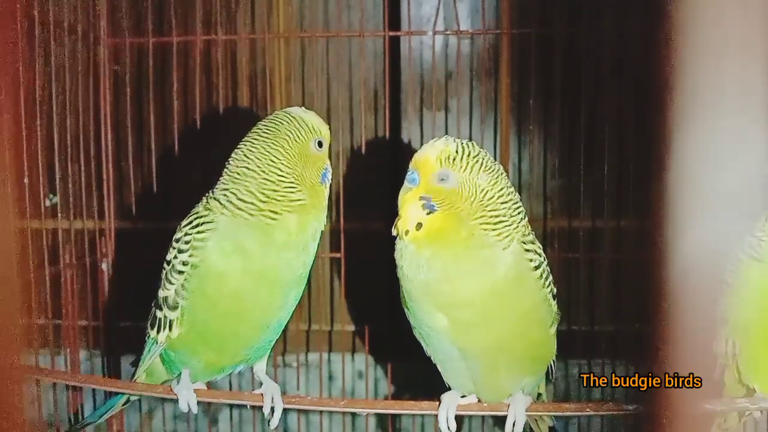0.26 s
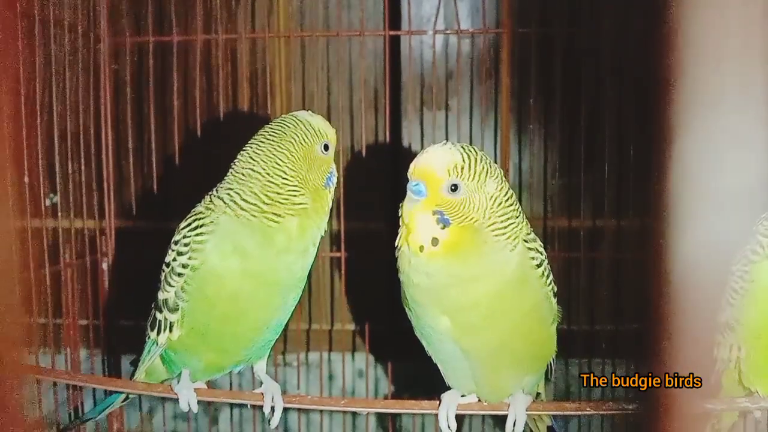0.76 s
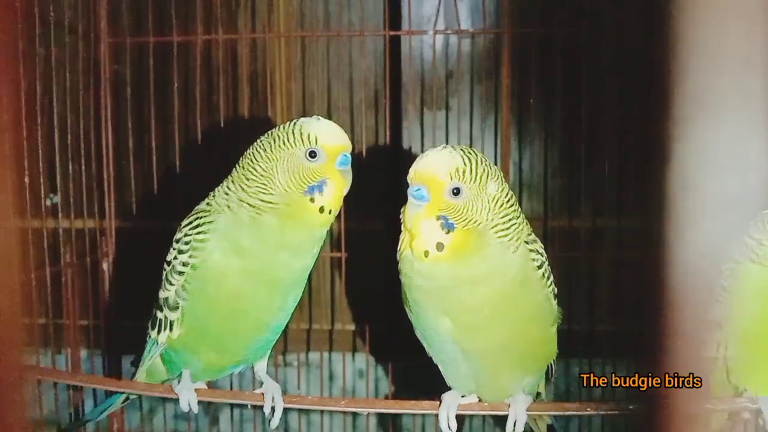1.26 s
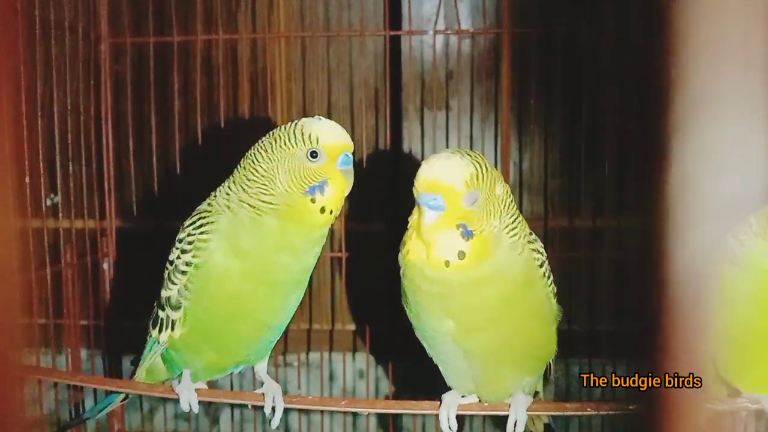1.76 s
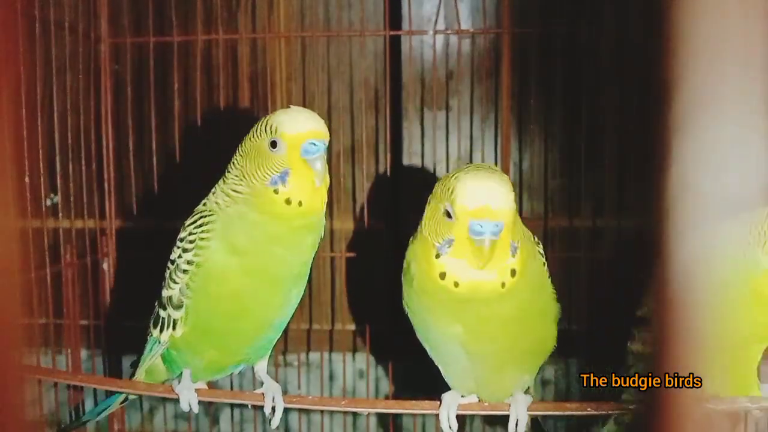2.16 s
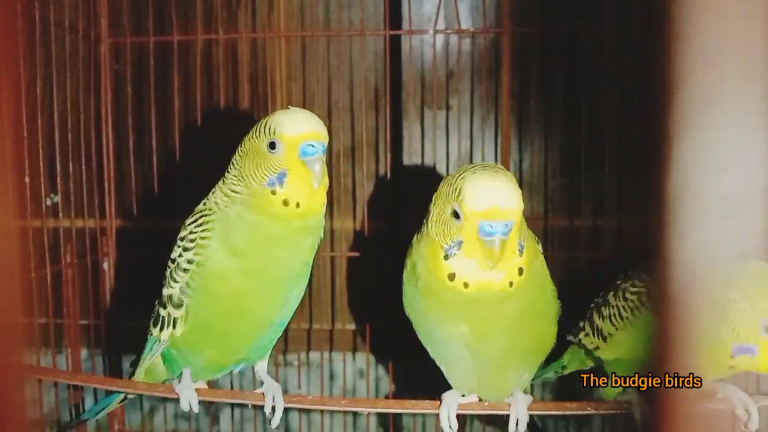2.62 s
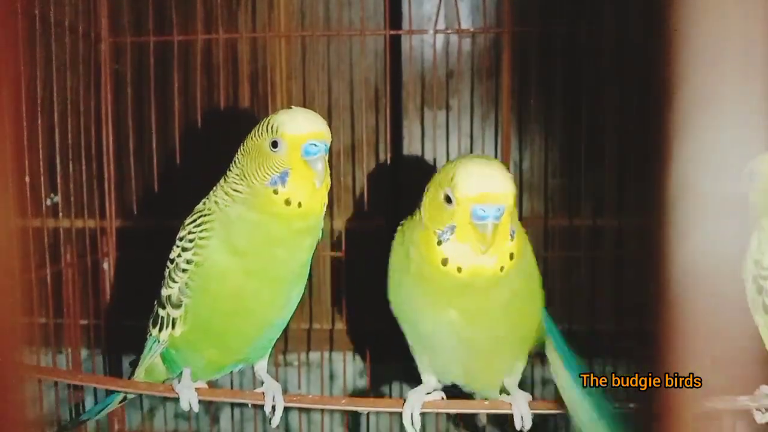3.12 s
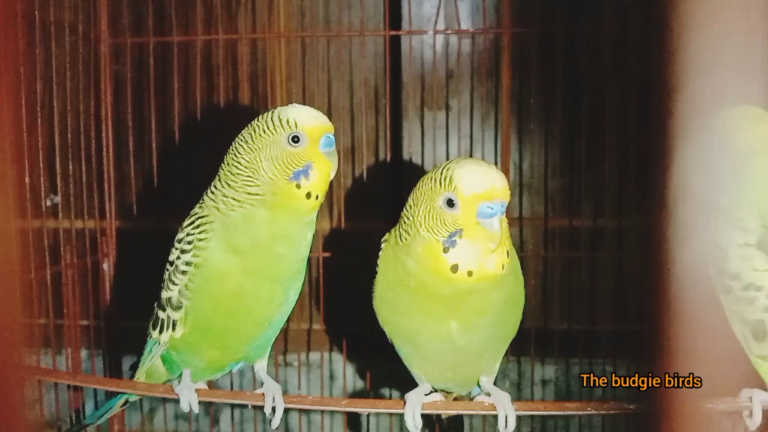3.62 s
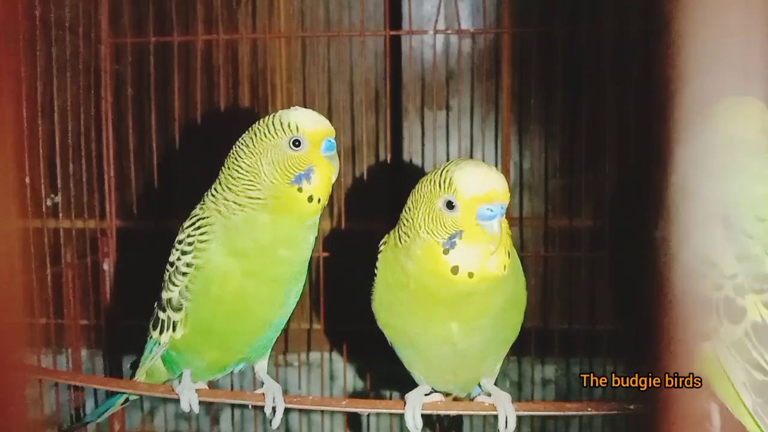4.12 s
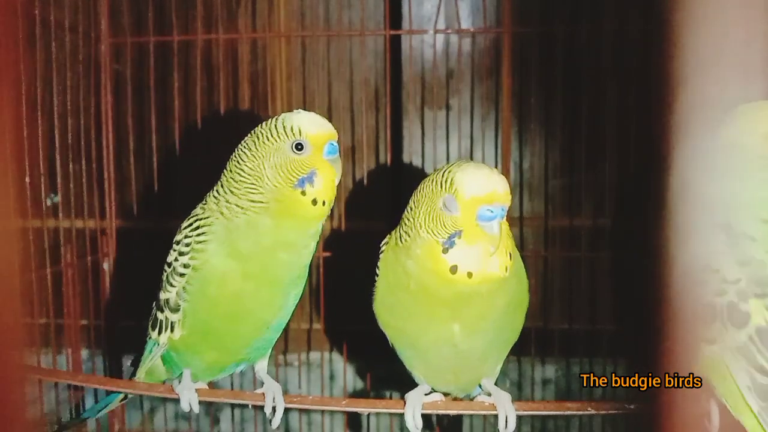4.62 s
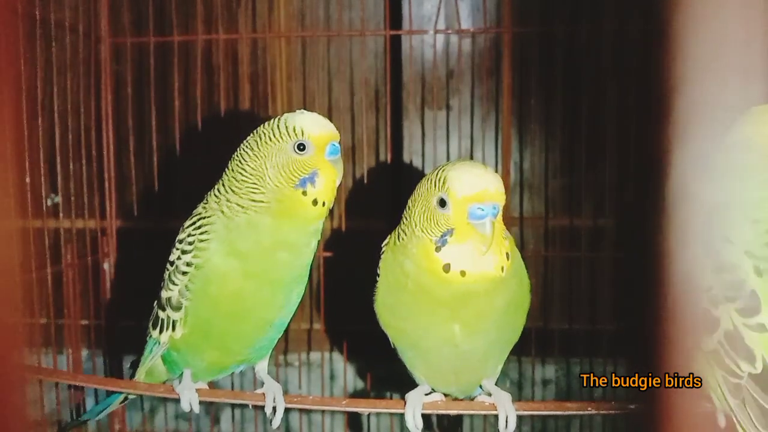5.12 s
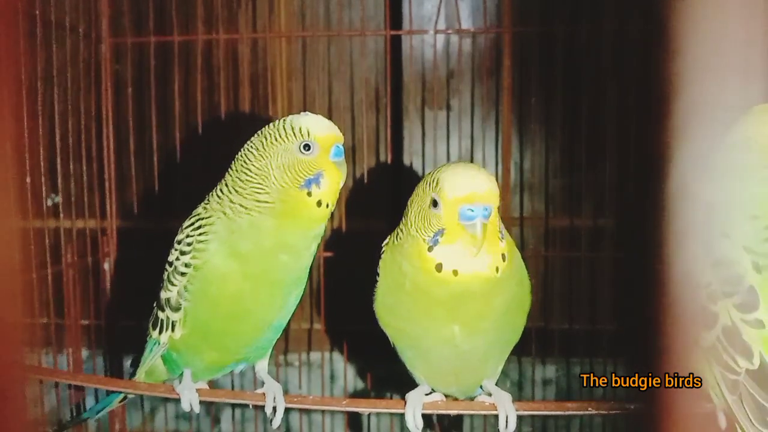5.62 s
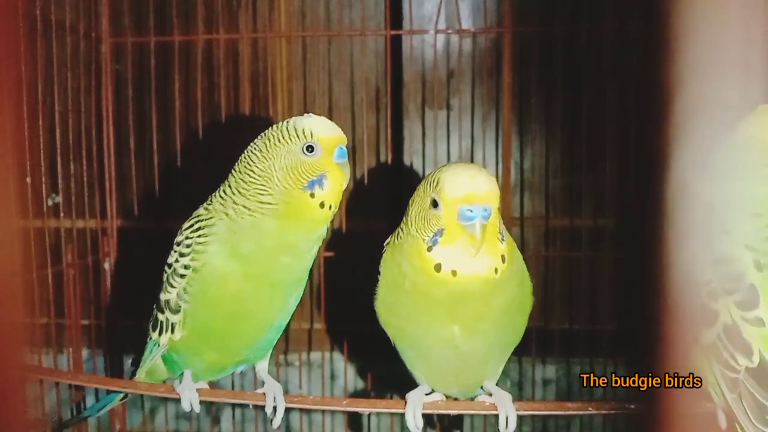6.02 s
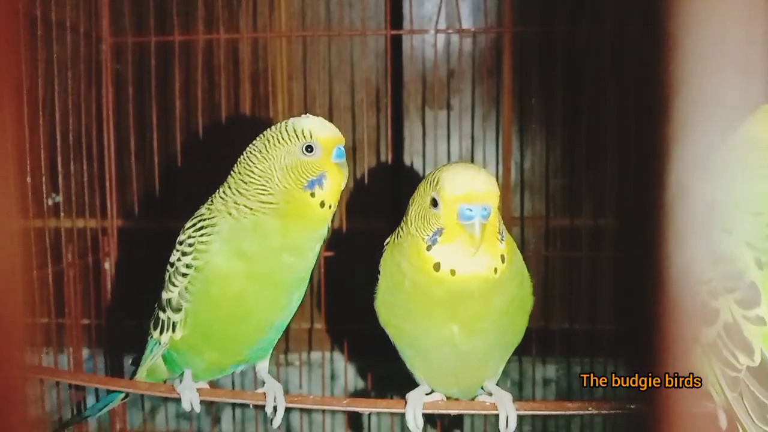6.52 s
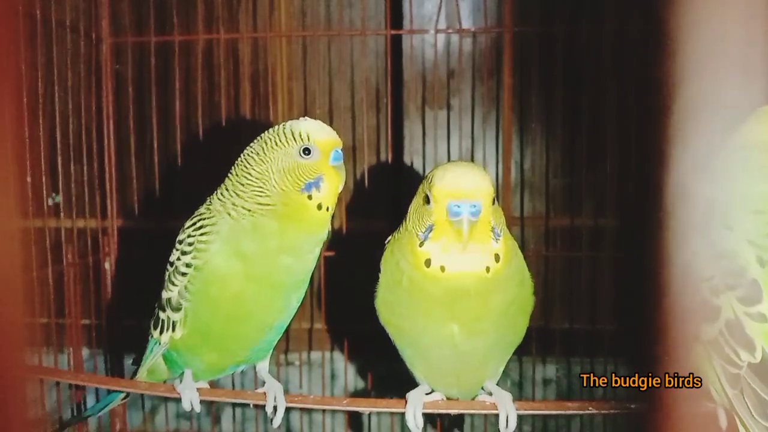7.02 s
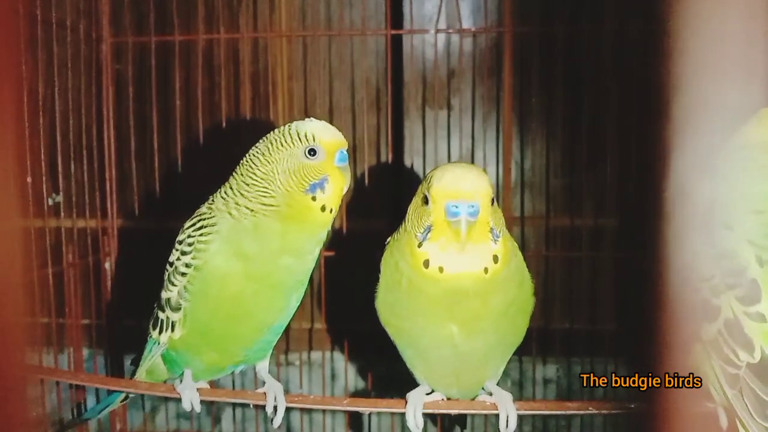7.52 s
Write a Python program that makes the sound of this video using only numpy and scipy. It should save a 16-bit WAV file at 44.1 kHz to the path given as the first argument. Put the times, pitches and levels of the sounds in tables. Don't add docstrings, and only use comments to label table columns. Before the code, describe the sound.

Small caged parakeets chatter in quick bright chirps, scratchy rasps and soft warbles, close up in a quiet hard-walled room with faint distant traffic.

```python
import sys
import numpy as np
from scipy import signal
from scipy.fft import rfft, irfft
from scipy.io import wavfile
from scipy.ndimage import uniform_filter1d, minimum_filter1d

SR = 44100
rng = np.random.default_rng(int(sys.argv[2]) if len(sys.argv) > 2 else 0)


def voltage_ratio(level):
    return 10 ** (np.asarray(level, float) / 20)


def log_audio(samples):
    frames = np.atleast_2d(samples).T
    limited = np.clip(frames, -1, 1)
    pcm = np.round(limited * 32767).astype(np.int16)
    wavfile.write(sys.argv[1], SR, pcm)


N = 342657

# time in seconds, pitch in Hz,
# fundamental level in dB, second partial level in dB (it rises as the beak opens).
BUILDING_CHATTER = [
    [(1.671, 2100, -39.5, -35.5), (1.676, 2605, -31, -13), (1.68, 2836, -20.5, -6),
     (1.683, 1872, -35.5, -24.5), (1.6855, 1595, -34.5, -18.5), (1.689, 2785, -24, -9),
     (1.693, 3064, -18.5, -10), (1.697, 2760, -30.5, -18.5)],
    [(1.742, 2020, -38.5, -29.5), (1.7513, 2913, -24, -4), (1.7527, 1880, -29, -21),
     (1.755, 1702, -35, -13), (1.76, 1603, -30.5, -16)],
    [(1.7575, 2343, -30.5, -22.5), (1.7605, 2880, -18.5, -10), (1.7642, 3470, -10.5, -28.5),
     (1.7667, 3625, -13.5, -35.5), (1.772, 3213, -37, -39)],
    [(1.818, 2430, -40.5, -27), (1.824, 2800, -30, -5), (1.828, 3040, -17.5, -14),
     (1.8315, 3328, -12.5, -24.5), (1.839, 3050, -19, -16), (1.8429, 2994, -47.5, -27.5)],
    [(1.883, 2490, -36.5, -20), (1.8862, 2816, -21.5, -4), (1.8917, 3550, -10, -33),
     (1.8957, 3543, -10, -53), (1.9067, 3588, -15.5, -37), (1.9099, 3184, -32, -41)],
    [(1.902, 2530, -31.5, -22.5), (1.916, 2643, -29.5, -16.5), (1.928, 2677, -30, -20),
     (1.932, 3115, -18, -10.5), (1.94, 3474, -24, -8), (1.951, 3243, -21, -6), (1.9545, 2776, -25, -10),
     (1.958, 2245, -36, -17)],
    [(1.993, 2300, -37.5, -38.5), (1.9952, 2580, -32, -22), (1.9997, 2880, -26.5, -12.5),
     (2.0032, 2900, -17.5, -9.5), (2.008, 2942, -34.5, -29.5)],
]
PEAK_CHATTER = [
    [(2.008, 2450, -38.5, -28.5), (2.0127, 2612, -34, -13.5), (2.0162, 2632, -34.5, -10),
     (2.0177, 2399, -30, -9), (2.0227, 3220, -19, -9.5), (2.0255, 3286, -20, -10.5),
     (2.0287, 3465, -31, -5), (2.0339, 2756, -30.5, -14)],
    [(2.078, 2580, -42.5, -29.5), (2.0817, 2764, -30, -13), (2.0842, 3080, -22.5, -17),
     (2.0862, 3174, -25.5, -23), (2.0929, 3030, -15.5, -7)],
    [(2.087, 2522, -40.5, -18), (2.0912, 2833, -28.5, -13.5), (2.0932, 2096, -40.5, -25),
     (2.099, 1788, -28.5, -27.5), (2.1045, 3330, -23.5, -2), (2.1077, 3570, -21, -13.5),
     (2.1092, 2906, -24, -8), (2.1107, 2593, -23.5, -2.5), (2.1149, 2630, -42, -31)],
    [(2.2, 2539, -35, -7), (2.2042, 2727, -22.5, -7.5), (2.2092, 2886, -19.5, -7.5),
     (2.2117, 3035, -20, -12.5), (2.2137, 2875, -23.5, -15.5), (2.222, 2609, -38.5, -42.5)],
    [(2.283, 2222, -43, -24.5), (2.2897, 2764, -20, -4.5), (2.2922, 2701, -27, -12),
     (2.2942, 2308, -34, -18), (2.2957, 2012, -24, -16), (2.3002, 3085, -22.5, -11.5),
     (2.3032, 3334, -11, -19), (2.3079, 3275, -28.5, -27)],
    [(2.8, 2110, -34.5, -29.5), (2.8042, 2712, -20, -7.5), (2.8062, 2890, -15, -7.5),
     (2.8107, 3076, -16.5, -21.5), (2.8169, 2946, -25.5, -27.5)],
    [(2.868, 2546, -25.5, -14), (2.8712, 2896, -27, -10.5), (2.8747, 2774, -16, -13),
     (2.8762, 2889, -15, -11), (2.8829, 2593, -43.5, -24)],
]
WANING_CHATTER = [
    [(2.93, 2212, -27.5, -29.5), (2.9327, 2562, -18, -7), (2.9377, 3088, -8, -27.5),
     (2.9412, 3320, -10.5, -24.5), (2.9462, 3347, -14, -29), (2.9559, 3231, -33.5, -46)],
    [(3.021, 2453, -29, -21.5), (3.0252, 2770, -24, -5.5), (3.0297, 3067, -14, -13),
     (3.0392, 3190, -18.5, -21.5), (3.0442, 2828, -27, -21), (3.0459, 2785, -44, -32.5)],
    [(3.103, 2557, -26.5, -33.5), (3.1052, 2590, -28, -8), (3.1092, 2904, -19.5, -13.5),
     (3.1147, 3003, -15.5, -20), (3.1177, 2859, -22.5, -15), (3.121, 2583, -44.5, -52)],
    [(3.6145, 2400, -30.5, -22), (3.618, 2450, -31, -19.5), (3.6225, 1650, -26, -25.5),
     (3.6263, 2000, -26.5, -31), (3.628, 2900, -21, -9.5), (3.633, 3350, -23.5, -18),
     (3.635, 2850, -32.5, -17), (3.639, 2000, -32, -33.5)],
]
CONTACT_CALLS = [
    [(4.607, 2700, -40, -63), (4.62, 3150, -30, -43), (4.635, 3210, -22, -32), (4.648, 2767, -28, -50.5),
     (4.657, 2970, -30, -54.5), (4.666, 2417, -33, -43.5), (4.681, 2327, -29, -50.5),
     (4.691, 1960, -25.5, -49.5)],
    [(4.691, 2224, -31, -43), (4.702, 2473, -23, -43), (4.708, 3175, -18, -30), (4.712, 3510, -32, -28.5),
     (4.718, 2917, -19.5, -38), (4.738, 2443, -22.5, -32), (4.752, 3130, -20.5, -42),
     (4.761, 1950, -31, -39.5), (4.778, 1150, -39, -45)],
    [(4.856, 2500, -30.5, -21), (4.861, 3310, -17.5, -31.5), (4.866, 2275, -29.5, -25),
     (4.876, 2600, -24.5, -21.5), (4.899, 2915, -20.5, -47), (4.905, 1800, -32, -42),
     (4.914, 1870, -34.5, -49)],
    [(4.916, 2255, -30, -53.5), (4.923, 3144, -17.5, -42.5), (4.933, 3100, -15.5, -44.5),
     (4.937, 2862, -20, -26.5), (4.943, 3228, -9, -33), (4.951, 2920, -19, -27),
     (4.956, 3010, -12.5, -22.5), (4.962, 1874, -27.5, -25.5)],
    [(4.962, 1902, -22, -39.5), (4.969, 2336, -31.5, -25.5), (4.987, 2090, -25.5, -31.5),
     (4.997, 2475, -24, -36), (5.008, 2430, -22.5, -37), (5.014, 1500, -36, -44), (5.03, 1150, -40, -43)],
]
# start in seconds, length in ms, top pitch in Hz, fundamental level in dB,
# second partial level in dB.
SHORT_CHIRPS = [
    (1.404, 23, 3295, -22, -20.5),
    (1.4665, 13.5, 2920, -21, -9.5),
    (1.529, 18.9, 3206, -17.5, -9),
    (1.607, 20.9, 3242, -16, -9),
]
# second partial over the first in dB, then a curve whose points are
# time in seconds, pitch in Hz, effort in dB.
TWITTERS = [
    (9.3, [(3.493, 2270, -22), (3.498, 2470, -21), (3.512, 2444, -24), (3.524, 3045, -24.5), (3.533, 2630, -22.5), (3.546, 1716, -25.5)]),
]
# frequency in Hz, level in dB.
BEAK = [(5000, -1.5), (8000, -17.5), (10500, -27), (12000, -24), (14500, -22)]
# frequency in Hz, level in dB.
WINDPIPE = [(1500, -5), (2300, -10.5), (3200, 3), (4200, -15.5), (5500, -0.5), (6300, -6.5), (7200, 25)]
# start in seconds, length in ms,
# start pitch in Hz, end pitch in Hz, level in dB.
ARCHED_WARBLES = [(.589, 50, 740, 780, -50), (2.24, 28, 1780, 1683, -29.5), (2.747, 29.6, 1068, 830, -31.5),
                  (3.247, 18.3, 1435, 1646, -32.5), (3.3225, 22, 1150, 1150, -27),
                  (3.401, 17.9, 1150, 1920, -34), (5.251, 48, 881, 1000, -46.5),
                  (5.358, 16.7, 937, 1150, -42), (5.376, 20, 1200, 980, -42.5), (5.639, 30, 1073, 844, -33),
                  (6.62, 13.2, 1045, 885, -37.5), (7.098, 34, 1350, 1150, -33.5),
                  (7.318, 34, 985, 1127, -36)]
SLIDING_WARBLES = [(7.175, 13, 1100, 1490, -33), (3.146, 57, 1310, 1950, -37), (3.183, 23, 1900, 1300, -35),
                   (5.454, 15, 3200, 4300, -45), (5.872, 52, 1000, 940, -37.5), (5.468, 31, 900, 1290, -47),
                   (6.95, 52, 1120, 960, -38), (7.187, 66, 1390, 1494, -31), (7.242, 49, 1397, 1395, -30)]
SAGGING_WARBLES = [(.665, 31.4, 1485, 1236, -42), (.402, 58, 1170, 1000, -49.5),
                   (5.434, 21, 1920, 1700, -53), (5.546, 25, 1346, 1104, -39.5),
                   (5.732, 22.7, 1436, 1084, -37), (5.839, 30, 1305, 1134, -32),
                   (6.588, 34, 940, 1000, -41.5), (7.353, 30, 1565, 1333, -38.5)]
FAR_COOS = [
    (1.332, 63.24, 1837, 1300, -53),
    (1.543, 47.52, 1470, 1417, -43),
    (1.627, 38.98, 1550, 1455, -44),
    (1.713, 37.04, 1387, 1100, -46.5),
]
# frequency in Hz, level in dB.
TRACT = [(1100, -2), (2100, -3), (3200, 8), (4200, -12), (5400, -6.5), (6300, -12), (7800, -5),
         (11000, -28.5), (15000, -20.5)]
# start in seconds, length in ms,
# middle throat band level in dB, upper band over the middle in dB.
SHARP_RASPS = [(0.722, 45, -29, -9), (0.966, 33.5, -38, -6.5), (1.003, 25.5, -29.5, -0.5),
               (1.463, 9, -20, 0.5), (4.8555, 5, -26.5, 1.5), (2.328, 24, -28.5, 4.5),
               (2.354, 24, -26.5, 6), (2.374, 36, -29, 2), (2.522, 31, -29, 1), (2.578, 23.7, -18.5, -0.5),
               (2.824, 19, -24, 7), (2.194, 9, -27, 1), (2.795, 8.9, -28.5, 6), (2.861, 14, -28, 8.5),
               (3.097, 12, -30, 3.5), (3.015, 9.8, -39.5, 8), (6.017, 6.7, -44, -4), (6.074, 45, -30.5, -6),
               (6.116, 29, -22.5, 0), (6.455, 6.4, -49.5, -5), (6.466, 6.2, -46.5, -4)]
THROATY_RASPS = [(0.696, 31, -41, -20), (0.758, 28, -22, -1), (1.024, 24, -32.5, 0.5),
                 (2.6, 20.6, -28.5, 1.5), (2.744, 41, -28, 5), (2.848, 21, -26, -13),
                 (2.922, 8.6, -23.5, -2), (5.414, 14, -47.5, -22), (5.625, 4.8, -43, -11),
                 (5.755, 40, -43, -17), (5.802, 130, -43.5, -16), (6.033, 37.7, -40.5, -10),
                 (6.408, 13.5, -49, -6), (6.729, 20, -39, -3), (6.78, 9.2, -33, 0),
                 (6.792, 8.5, -36.5, -10), (7.13, 20.6, -33, -3.5), (7.165, 21, -37.5, -3.5),
                 (7.295, 6.1, -31.5, -9), (7.55, 20.5, -28, 0.5), (7.565, 14.4, -30.5, -3)]
# frequency in Hz, width in Hz, level in dB.
THROAT = [
    [(1150, 250, 10.5), (1902, 280, 12.5)],
    [(3140, 850, 5), (2500, 64, -0.5)],
    [(5110, 1900, 12.5), (7020, 770, 5), (9910, 22000, -18.5)],
    [(13800, 4100, 0)],
]
SHRILL_THROAT = [
    [(1400, 300, 0)],
    [(3400, 800, 0)],
    [(5550, 600, 0), (6900, 1400, -9), (9900, 6000, -26)],
    [(14000, 3500, 0)],
]
# time in seconds, middle throat band level in dB, upper band level in dB.
PIPS = [(0.0045, -20.5, 6.5), (0.0081, -15, -1.5), (0.016, -18.5, -4), (0.0223, -11.5, -3),
        (0.03, -15.5, -10.5), (0.9806, -30, -51), (1.0073, -18, -22), (1.011, -33, -23), (1.0303, -30, -31),
        (1.0336, -33, -26.5), (2.329, -22, -11.5), (2.3359, -26.5, -21), (2.3421, -26, -13),
        (2.3604, -29, -14), (2.3672, -24, -3), (2.387, -15, -21), (2.777, -18, -19), (2.788, -31.5, -16.5),
        (2.826, -27, -14), (2.836, -14.5, -13), (2.8414, -13, -10.5), (2.849, -20.5, -8.5),
        (2.8523, -29.5, -15),
        (6.085, -19, -38), (6.092, -18, -33), (6.104, -18, -38), (5.19, -70, -50)]
# start in seconds, peak level in dB.
TICKS = [(0.1544, -49), (0.1943, -47), (0.3212, -55.5), (0.3755, -57), (0.5596, -53.5), (1.1166, -47),
         (3.256, -39), (3.326, -37.5), (3.4042, -44), (3.7628, -49.5), (3.9195, -52.5), (4.0098, -51.5),
         (4.2599, -49.5)]
# start in seconds, peak level in dB.
KNOCKS = [(2.525, -51), (2.754, -53), (6.018, -56), (6.41, -54.5), (6.728, -50), (6.779, -56)]
# frequency in Hz, time to die by 60 dB in seconds.
WALLS = [(700, 0.46), (3000, 0.34), (6000, 0.32), (13000, 0.29)]
# time in seconds, pitch in Hz, level in dB.
ENGINES = [
    [(0, 61, -69), (.15, 62.4, -54.5), (.4, 65, -86)],
    [(2.4, 53.7, -64), (3.3, 61.7, -63), (3.6, 62, -73)],
    [(4.7, 78.3, -93), (5.05, 82, -51), (5.45, 84, -60.5), (5.7, 84, -86)],
    [(.5, 142.4, -68), (.82, 155.3, -49.5), (1.2, 149.3, -72.5)],
    [(4.0, 142, -90), (4.75, 156, -57), (5.05, 166, -59), (5.5, 148.5, -64)],
]
# peak time in seconds, peak level in dB, fall to each side in dB per second.
TRAFFIC = [(0, -59, 50.5), (.78, -49, 66), (1.101, -57.5, 81), (1.55, -64.5, 37.5), (2.1, -70.5, 21.5),
           (2.9, -61, 13), (3.649, -59.5, 82), (4.95, -56.5, 23.5), (6.15, -61.5, 64), (6.799, -51, 151)]
# frequency in Hz, density in dB per Hz.
HUSH = [(300, -16), (900, -8), (1600, -5.5), (2100, -19.5), (7800, -13), (16000, -20)]

POP_LEAD = 130
PIP_MS = 4.2


def evened(x):
    return x / np.sqrt(np.mean(x ** 2) + 1e-20)


def read(points, hz):
    f, value = np.transpose(points)
    return np.interp(np.log(hz + 1), np.log(f + 1), value)


def add(mix, s, sound):
    part = mix[max(round(s * SR), 0):][:len(sound)]
    part += sound[:len(part)]


def columns(rows):
    s, *rest = np.transpose(rows)
    t = np.arange(s[0], s[-1], 1 / SR)
    return [uniform_filter1d(np.interp(t, s, c), size=40) for c in rest]


def wobble(n, span):
    once = uniform_filter1d(rng.standard_normal(n), span)
    return evened(uniform_filter1d(once, span))


def ring(x, hz, width):
    b, a = signal.iirpeak(min(hz, SR * .45), hz / width, SR)
    return signal.lfilter(b, a, signal.lfilter(b, a, x))


def coloured(points):
    hz = np.fft.rfftfreq(N, 1 / SR)
    return evened(irfft(rfft(rng.standard_normal(N)) * voltage_ratio(read(points, hz)), N))


def fade(n, rise, fall):
    t = np.arange(n) / SR
    return np.clip(t / rise, 0, 1) * np.clip(t[::-1] / fall, 0, 1)


def membranes(hz, levels_db, jitter, flutter_db):
    n = len(hz)
    unsteady = wobble(n, span=25) + 1.2 * wobble(n, span=160)
    turns = np.cumsum(hz * (1 + jitter * unsteady)) / SR
    tone = np.zeros(n)
    for k, db in enumerate(levels_db, 1):
        flutter = flutter_db * min(k, 3) ** 0.75 * wobble(n, span=50)
        audible = k * hz < SR * .4
        tone += np.sqrt(2) * voltage_ratio(db + flutter) * audible * np.sin(2 * np.pi * k * turns)
    return tone


def chirp(hz, first_db, over_db, pop_db, flutter_db):
    second_db = first_db + over_db
    upper = [second_db + read(BEAK, k * hz) - 0.89 * (k - 2) for k in range(3, 8)]
    tone = membranes(hz, [first_db, second_db] + upper, jitter=0.012, flutter_db=flutter_db)
    breath = voltage_ratio(second_db - 19.5) * rng.standard_normal(len(hz))
    tone = (tone + ring(breath, 8800, 9000)) * fade(len(hz), 0.0023, 0.0023)
    tone = np.pad(tone, (POP_LEAD, 0))
    add(tone, 0, rasp(9, np.mean(second_db) + pop_db, 1, -7))
    return tone


def chatter(rows, *voice):
    hz, first_db, second_db = columns(rows)
    return chirp(hz, first_db, second_db - first_db, *voice)


def short_chirp(ms, top_hz, first_db, second_db):
    t = np.arange(0, ms, 1000 / SR)
    scoop, drop = 0.38 * np.exp(-t / 5.2), 0.2 * np.exp((t - ms) / 2.6)
    hz = top_hz * (1 - scoop - drop)
    effort_db = -8 * (2 * t / ms - 1) ** 4
    shut_db = 3 * (t / ms - .5)
    first = first_db + effort_db + read(WINDPIPE, hz)
    second = second_db + effort_db + read(WINDPIPE, 2 * hz) - shut_db
    return chirp(hz, first, second - first, pop_db=-13, flutter_db=0.9)


def twitter(over_db, rows):
    hz, effort_db = columns(rows)
    first_pipe, second_pipe = read(WINDPIPE, hz), read(WINDPIPE, 2 * hz)
    return chirp(hz, effort_db + first_pipe, over_db + second_pipe - first_pipe, pop_db=-18, flutter_db=1.3)


def warble(ms, start_hz, end_hz, db, bend, tilt_db, scratch_db):
    u = np.linspace(-1, 1, round(ms * SR / 1000))
    mean_hz = (start_hz + end_hz) / 2
    hz = u * (end_hz - start_hz) / 2 + mean_hz * (bend + u ** 2 * (1 - bend))
    shape = np.array([read(TRACT, k * hz) - tilt_db * k for k in range(1, 9)])
    shape -= 10 * np.log10(voltage_ratio(2 * shape[0]) + voltage_ratio(2 * shape[1]))
    effort_db = db - 0.24 * u ** 2 - 5 * u
    tone = membranes(hz, shape + effort_db, jitter=.012, flutter_db=1.9) * fade(len(hz), .002, .004)
    add(tone, 0, rasp(ms - 5, db + scratch_db - .2 * ms, -6, -8))
    return tone


def rasp(ms, mid_db, high_db, low_db, rise=.0012, throat=THROAT):
    n = max(round(ms * SR / 1000), 60)
    turns = np.cumsum(230 * np.exp(0.44 * wobble(n, span=150))) / SR
    puff = .3 + np.exp(-(turns % 1) / .24)
    swell = voltage_ratio(2.6 * wobble(n, span=200)) * fade(n, rise * n / 400, 0.0056)
    drive = np.pad(puff * swell * rng.standard_normal(n), (0, 200))
    shift = np.exp(.015 * rng.standard_normal())
    bands = []
    for band in throat:
        bands.append(evened(sum(voltage_ratio(db) * ring(drive, hz * shift, width) for hz, width, db in band)))
    low, middle, high, top = bands
    top_db = 2.5 * high_db - 28.0
    return voltage_ratio(mid_db) * (voltage_ratio(low_db) * low + middle + voltage_ratio(high_db) * high + voltage_ratio(top_db) * top)


def pip(mid_db, high_db):
    t = np.arange(0, PIP_MS, 1000 / SR) / 1000
    hz = np.multiply((3150, 5500), 1 + .03 * rng.standard_normal(2))[:, None]
    rings = voltage_ratio([[mid_db], [high_db]]) * np.sin(2 * np.pi * (hz * t + rng.random((2, 1))))
    return rings.sum(0) * np.sin(np.pi * (t / t[-1]) ** 0.43) ** 2


def tick(db):
    t = np.arange(900) / SR
    snap = rng.standard_normal(len(t)) * np.exp(-t / 0.012)
    wire = ring(snap, 13800, 5000) + 0.57 * ring(snap, 10240, 6000) + 0.52 * ring(snap, 5530, 900)
    return voltage_ratio(db) * 2.1 * wire


def knock(db):
    t = np.arange(2500) / SR
    push = rng.standard_normal(len(t)) * np.exp(-t / 0.036)
    return voltage_ratio(db + 17.5) * (ring(push, 600, 300) + .5 * ring(push, 300, 200))


def room(x):
    out, turn = np.zeros(N), np.arange(N) / SR * np.pi * 4.3
    for k in range(3):
        taps = np.zeros(SR // 2)
        at = np.arange(260, len(taps) - 20, 20)
        taps[at + rng.integers(0, 20, len(at))] = rng.choice([-1., 1.], len(at))
        taps *= 1 - np.exp(-np.arange(len(taps)) / SR / 0.009)
        hz, t, z = signal.stft(taps, SR, nperseg=256)
        decay = voltage_ratio(-60 * t / read(WALLS, hz)[:, None])
        tail = signal.istft(z * decay, SR, nperseg=256)[1]
        share = np.cos(turn + k * np.pi / 3)
        out += signal.oaconvolve(x * share, tail / np.linalg.norm(tail))[:N]
    return out


def traffic():
    t = np.arange(N) / SR
    swell_db = np.max([db - fall * abs(t - s) for s, db, fall in TRAFFIC], axis=0)
    low = coloured([(20, -34.5), (55, -3.5), (120, 6.0), (180, -2.5), (280, -15.5), (450, -20.0), (700, -69.5)])
    rumble = voltage_ratio(np.maximum(swell_db, -72) - 4.0 + 6.2 * wobble(N, span=2500)) * low
    thump = ring(rng.standard_normal(N), 260, 160) * 10
    return rumble + voltage_ratio(swell_db - 11.5 + 3.7 * wobble(N, span=1800)) * thump


def engine(rows):
    hz, db = columns(rows)
    db = db + 4 * wobble(len(hz), span=1500)
    tone = np.sqrt(2) * voltage_ratio(db) * np.sin(2 * np.pi * np.cumsum(hz) / SR)
    return tone * fade(len(hz), 0.046, 0.058)


def background():
    out = voltage_ratio(-65 + 2 * wobble(N, span=2000)) * coloured(HUSH)
    out += traffic()
    for rows in ENGINES:
        add(out, rows[0][0], engine(rows))
    return out


def scene():
    birds, far, lead = np.zeros(N), np.zeros(N), POP_LEAD / SR
    loud = BUILDING_CHATTER + PEAK_CHATTER + WANING_CHATTER
    # pop dB, flutter dB
    for table, *voice in ((loud, -19, 1.1), (CONTACT_CALLS[:4], -12, 1.8), (CONTACT_CALLS[4:], -12, 2.8)):
        for rows in table:
            add(birds, rows[0][0] - lead, chatter(rows, *voice))
    for s, *note in SHORT_CHIRPS:
        add(birds, s - lead, short_chirp(*note))
    for over_db, rows in TWITTERS:
        add(birds, rows[0][0] - lead, twitter(over_db, rows))
    for table, bend in ((ARCHED_WARBLES, 1.2), (SLIDING_WARBLES, 1), (SAGGING_WARBLES, .88)):
        for s, *note in table:
            add(birds, s, warble(*note, bend, tilt_db=3.3, scratch_db=-10))
    for s, *note in FAR_COOS:
        add(far, s, warble(*note, 1.05, tilt_db=13.0, scratch_db=-17.5))
    # lower band over the middle in dB, rise
    for table, *throat in ((SHARP_RASPS, -22, .0025), (THROATY_RASPS, -6.5, .001)):
        for s, *burst in table:
            add(birds, s, rasp(*burst, *throat))
    add(birds, 0, rasp(34, -13.5, 8.5, -43.0, .0003, throat=SHRILL_THROAT))
    for s, *bands in PIPS:
        add(birds, s - PIP_MS / 2500, pip(*bands))
    for s, db in TICKS:
        add(birds, s, tick(db))
    no_bass = signal.butter(4, 550, "high", fs=SR, output="sos")
    birds = signal.sosfilt(no_bass, birds)
    for s, db in KNOCKS:
        add(birds, s, knock(db))
    echoes = voltage_ratio(-15.0) * room(birds + 7.2 * far)
    return (birds + echoes + 1.1 * far + background())[None]


def low_pass(x):
    return signal.sosfilt(signal.butter(12, 16680, fs=SR, output="sos"), x)


def record(dry):
    hz, t, z = signal.stft(dry, SR, nperseg=512, noverlap=384)
    power = uniform_filter1d(uniform_filter1d(abs(z) ** 2, size=7, axis=1), size=5, axis=2)
    under_db = np.clip(-75 - 10 * np.log10(power + 1e-16), 0, 14) * (hz > 500)[:, None]
    edge = 1 / (1 + (hz / 15600) ** 80)
    gated = signal.istft(z * voltage_ratio(-.9 * under_db) * edge[:, None], SR, nperseg=512, noverlap=384)[1][:, :N]
    crest = -minimum_filter1d(-abs(gated), size=121)
    limited = gated / uniform_filter1d(np.maximum(crest / .86, 1), size=121)
    return low_pass(limited)


dry = scene()
out = record(dry)
log_audio(out)
```